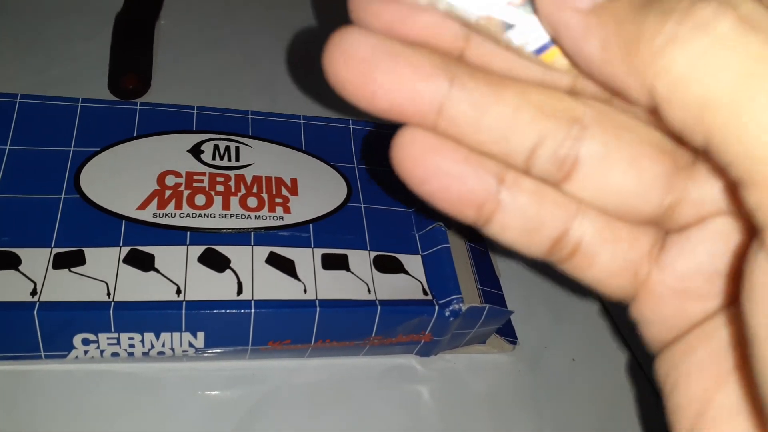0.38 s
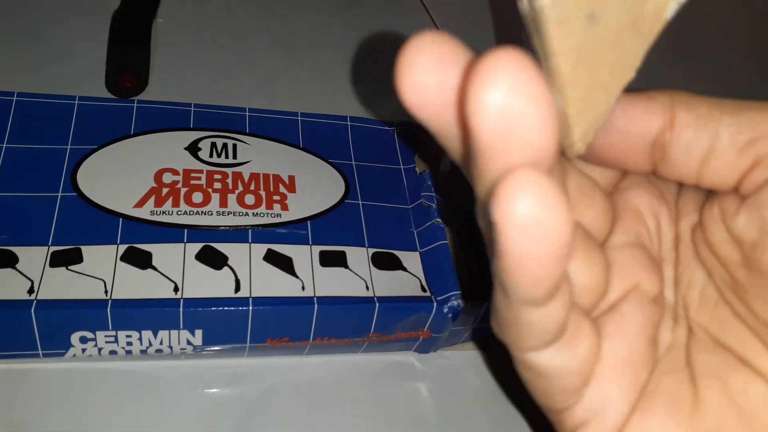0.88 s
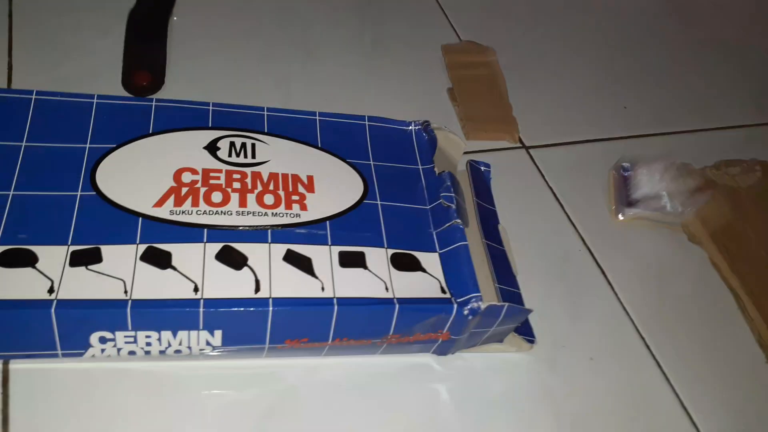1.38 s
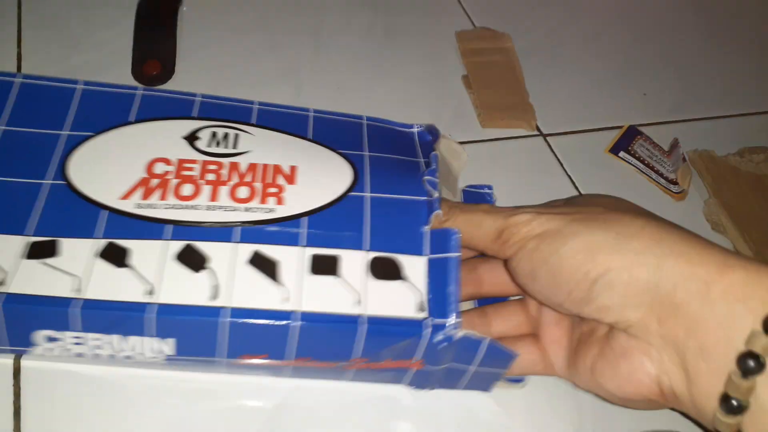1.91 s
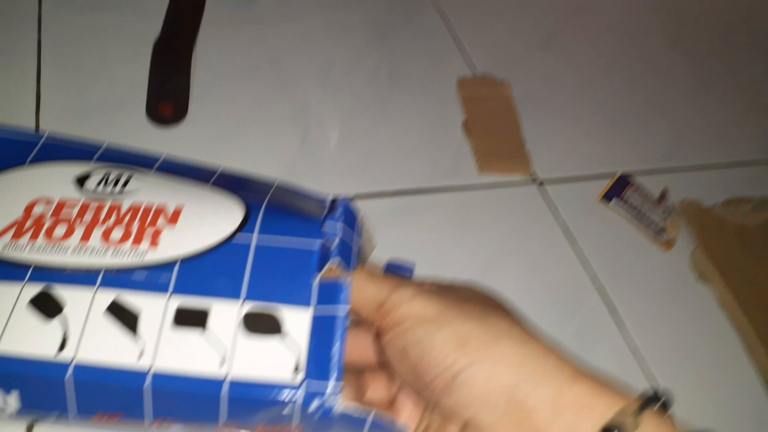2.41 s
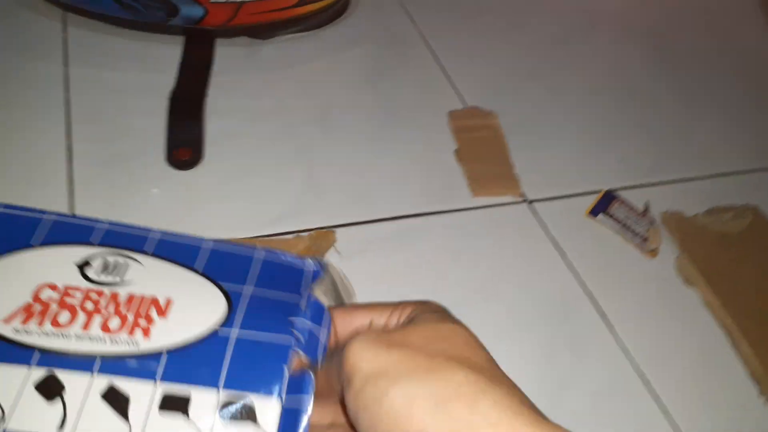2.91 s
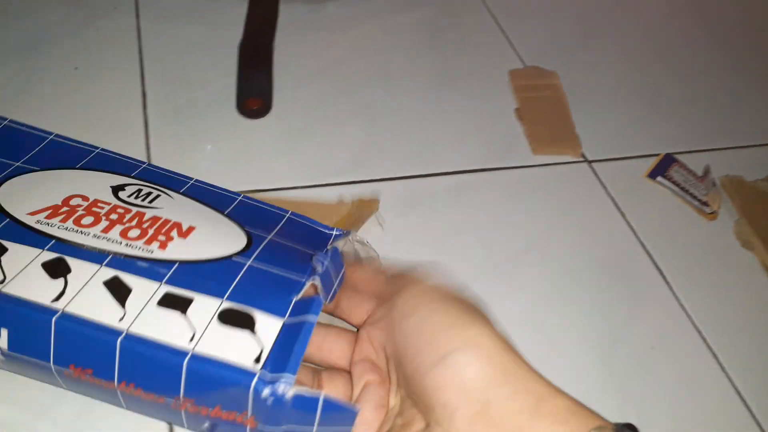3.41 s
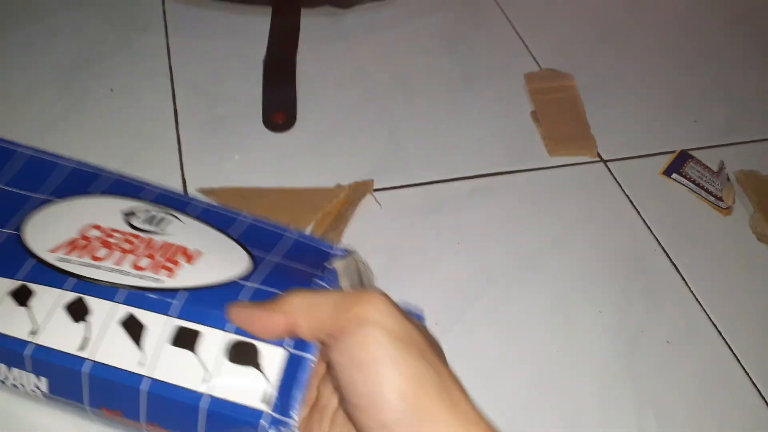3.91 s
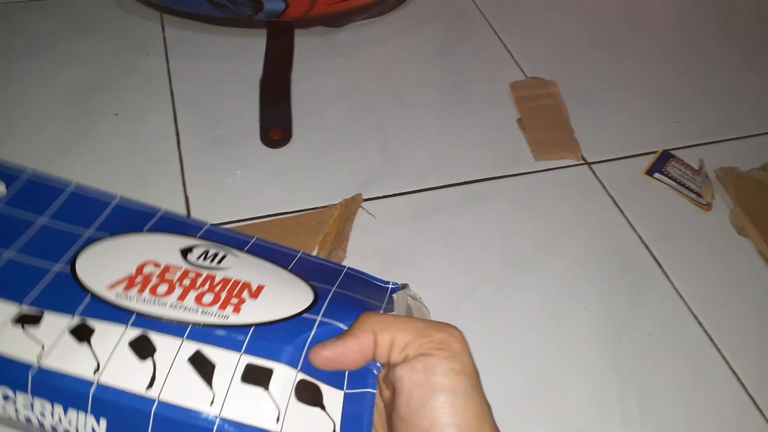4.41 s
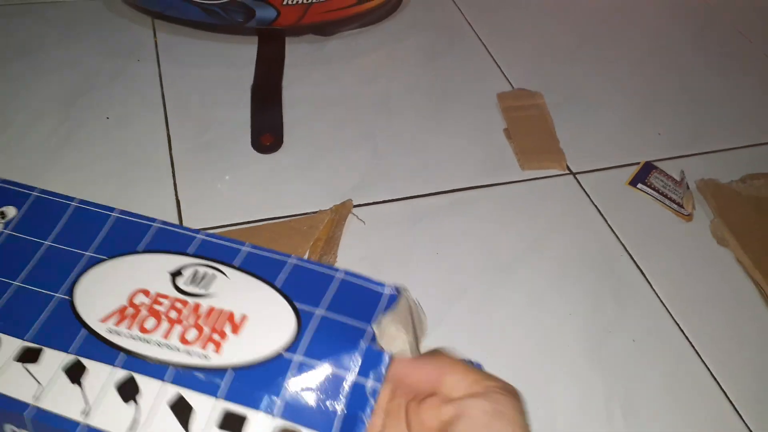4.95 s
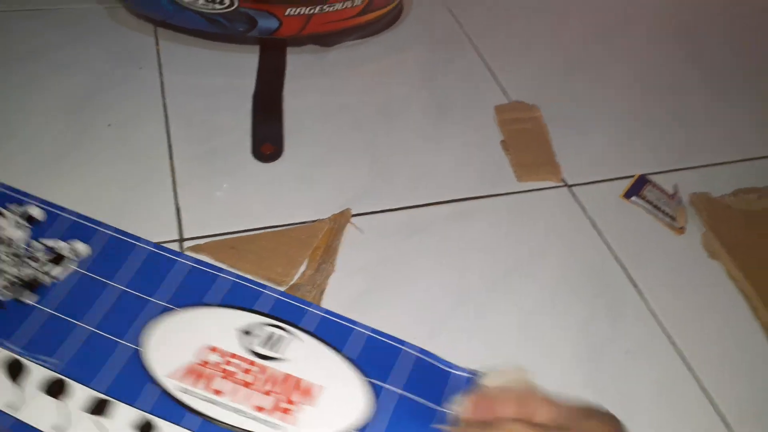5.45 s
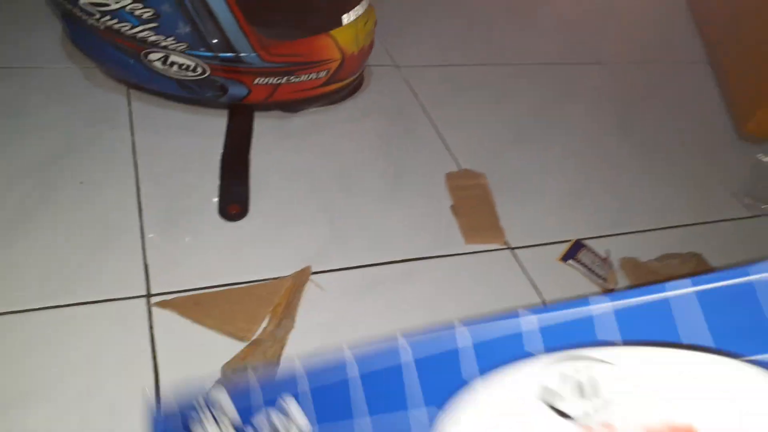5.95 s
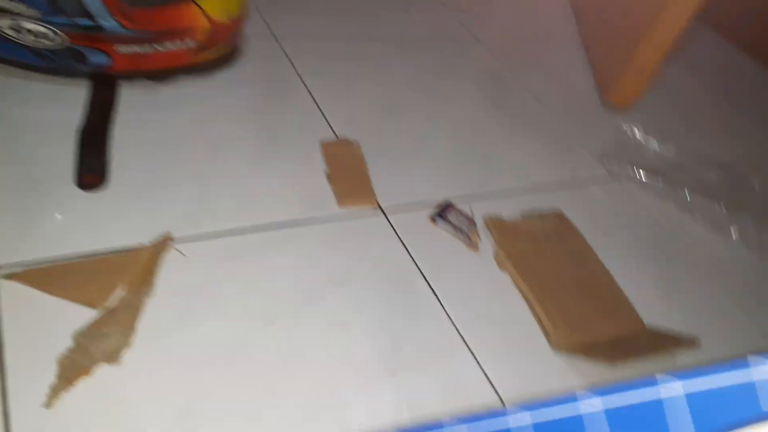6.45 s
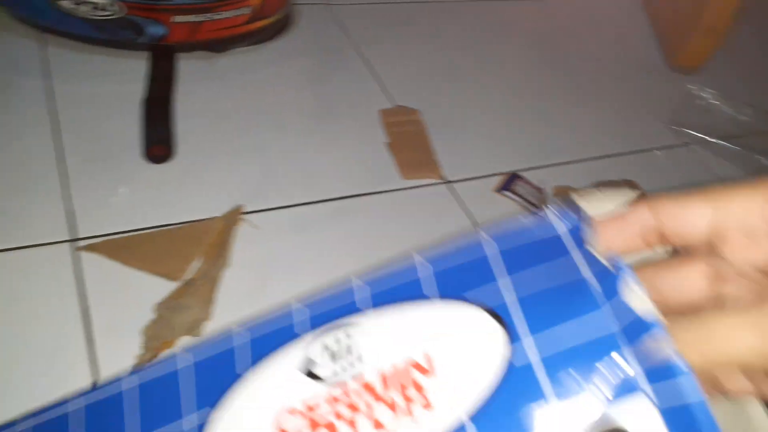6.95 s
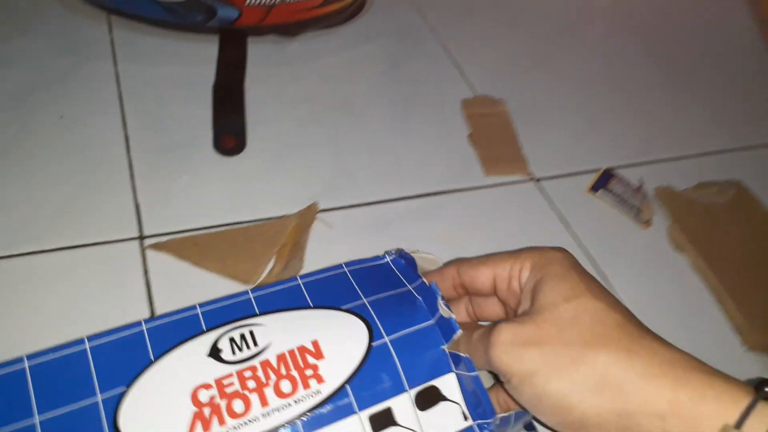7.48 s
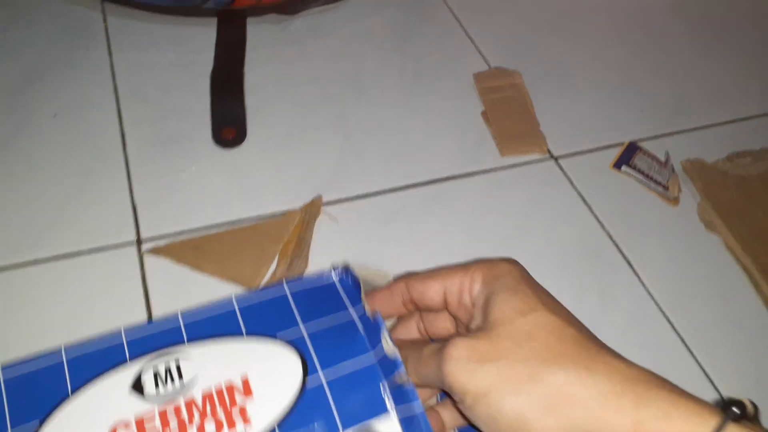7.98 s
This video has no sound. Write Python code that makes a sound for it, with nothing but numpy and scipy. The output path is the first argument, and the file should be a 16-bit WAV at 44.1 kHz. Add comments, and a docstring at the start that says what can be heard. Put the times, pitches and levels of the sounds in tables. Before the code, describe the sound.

Very soft bright flicks of card come first, almost silent between them. Rubbing and rasping of a cardboard box follows, with a hard cluster of knocks and cracks, then irregular thumps, scrapes and creases snapping, and a quick flap squeak. The handling softens but continues to the end. Close stereo pickup in a small tiled room.

```python
"""In a quiet, murmuring room fingers flick a glossy card flap, then scuff a loose scrap: shaped noise in short swells.
A hand drags and tears a cardboard box on tiles: streams of tiny slips shake its hollow, walls and fibres.
From 1.4 s the box knocks, as ringing modes that the room answers, and its card snaps, as short cracks of noise.
From 2.7 s the whole box also bumps the tiles; near 5.4 s a flap squeaks, as a fast train of slips with overtones.
Rubbing and knocks go on to the end at 8.1 s, heard by two microphones close by."""
import sys
import numpy as np
from scipy import signal
from scipy.fft import rfft, irfft, next_fast_len
from scipy.io import wavfile
from scipy.ndimage import uniform_filter1d, map_coordinates

SR = 44100
rng = np.random.default_rng(int(sys.argv[2]) if len(sys.argv) > 2 else 0)


def boost_factor(decibels):
    """Convert a level in decibels to a linear amplitude factor."""
    exponent = np.asarray(decibels, float) / 20
    return 10 ** exponent


def dump(signal):
    """Clip the signal to [-1, 1] and save it as 16-bit WAV at the path in sys.argv[1]."""
    limited = np.clip(np.atleast_2d(signal).T, -1, 1)
    pcm = np.round(limited * 32767).astype(np.int16)
    wavfile.write(sys.argv[1], SR, pcm)


N = 357147  # length in samples

# still air of the room and the microphones: (frequency [Hz], relative level [dB])
AIR_COLOUR = [(18, -81), (30, -42), (64, -5.5), (86, -8), (150, -8.5), (230, -16), (355, -27.5), (486, -34),
              (1040, -35), (3500, -47), (5200, -47), (7500, -49.5), (12000, -47.5), (16000, -47.5)]
AIR_DB = -67.5
# likeness of the two microphones: (frequency [Hz], likeness [0-1])
MIC_LIKENESS = [(60, 0.83), (150, 0.97), (300, 0.9), (700, 0.5), (1500, 0.23), (4000, 0.14), (15000, 0.1)]
# fingertips flicking the glossy flap: (time [s], level [dB])
FLICKS = [(.004, -56), (.042, -59.5), (0.06, -51), (.088, -60), (.211, -60), (0.244, -59.5), (0.272, -54.5),
          (.378, -58.5)]
# colour of the glossy flap: (frequency [Hz], relative level [dB])
FLAP_COLOUR = [(1760, -47), (3000, -23), (5370, -13.5), (6570, -7), (13300, -1.5), (16000, -27)]
FLICK_SWELL_S, FLICK_FADE_S, FLICK_TRAIL_S, FLICK_TRAIL_DB = 0.0056, 0.023, 0.18, -16
# a finger or edge dragging on one panel: (peak time [s], swell [s], fade [s], level [dB], pitch [Hz])
DRAGS = [(.15, 0.98, 0.89, -83.5, 4250), (.255, 0.062, 0.063, -57.5, 203), (1.655, 0.059, 0.048, -50, 1680),
         (1.822, .03, 0.037, -36, 1910), (6.33, 0.052, 0.077, -49, 923), (6.465, 0.033, 0.059, -47, 1080),
         (7.35, .08, 0.054, -57, 740), (7.595, 0.064, 0.056, -50, 1610)]
DRAG_Q = 4.5  # sharpness of the panel's narrow band
# weight of the hand, as the level a middling stroke reaches: (time [s], in the hollow [dB], in the walls [dB])
HAND_WEIGHT = [(0, -67, -52), (1.58, -63, -71.5), (1.66, -57.5, -62), (2.0, -50.5, -54.5),
               (2.5, -55, -62.5), (2.75, -51.5, -60.5), (2.95, -54, -54), (3.3, -52.5, -57),
               (3.56, -53, -64), (3.95, -54.5, -61), (4.5, -45, -48.5), (4.6, -54, -54.5),
               (5.1, -57, -57.5), (5.45, -50, -68.5), (5.9, -60, -55.5), (6.15, -58.5, -62),
               (6.6, -64, -62.5), (6.9, -58, -57), (7.4, -54, -60), (7.9, -54, -62), (8.1, -51, -52.5)]
# card rubbed and torn: (peak time [s], swell [s], fade [s], fibre hiss [dB], rasp [dB])
STROKES = [(0.64, 0.0036, 0.28, -69.5, -88), (0.772, 0.11, 0.046, -52.5, -71),
           (0.914, 0.1, 0.055, -68, -82), (1.289, 0.12, 0.076, -61.5, -74),
           (1.424, 0.0066, 0.4, -63.5, -73.5), (1.434, 0.0039, 0.048, -54.5, -59),
           (1.604, 0.0046, 0.24, -71, -47.5), (1.634, 0.095, 0.33, -51.5, -63),
           (1.816, 0.053, 0.17, -47, -41.5), (2.021, 0.1, 0.25, -49.5, -55.5),
           (2.225, 0.17, 0.12, -47, -46), (2.403, 0.28, 0.14, -49.5, -45), (2.534, 0.031, 0.15, -44.5, -42),
           (2.659, 0.042, 0.089, -46, -40), (2.707, 0.017, 0.083, -39, -24),
           (2.737, 0.029, 0.038, -38, -33.5), (2.791, 0.0049, 0.087, -43, -39.5),
           (2.898, 0.082, 0.18, -57.5, -59), (2.972, 0.01, 0.1, -53.5, -48),
           (3.065, 0.099, 0.073, -49, -50), (3.183, 0.14, 0.54, -54.5, -50), (3.429, 0.11, 0.16, -51, -52),
           (3.579, 0.0063, 0.099, -50.5, -36), (3.705, 0.1, 0.094, -51.5, -50.5),
           (3.832, 0.016, 0.15, -44.5, -43.5), (3.913, 0.037, 0.11, -43.5, -42.5),
           (4.043, 0.28, 0.077, -42.5, -36), (4.15, 0.0102, 0.11, -64.5, -60),
           (4.211, 0.0072, 0.15, -60.5, -55), (4.325, 0.0091, 0.16, -60.5, -63),
           (4.544, 0.0067, 0.75, -55, -48), (4.664, 0.077, 0.083, -44.5, -40),
           (4.712, 0.0081, 0.032, -50, -37.5), (4.784, 0.04, 0.085, -51, -44.5),
           (4.856, 0.0073, 0.074, -51.5, -37), (5.076, 0.0033, 0.033, -54, -23.5),
           (5.112, 0.13, 0.13, -47, -35), (5.3, 0.11, 0.14, -45.5, -47), (5.457, 0.059, 0.16, -44, -41.5),
           (5.553, 0.052, 0.44, -50.5, -48), (5.986, 0.064, 0.086, -57.5, -49),
           (6.126, 0.0043, 0.035, -67.5, -43.5), (6.155, 0.054, 0.1, -49, -41),
           (6.225, 0.042, 0.11, -51, -53.5), (6.343, 0.15, 0.049, -57, -46.5),
           (6.453, 0.079, 0.22, -57.5, -49), (6.635, 0.11, 0.29, -52.5, -50),
           (6.805, 0.01, 0.19, -46.5, -41.5), (7.02, 0.13, 0.092, -57, -53.5),
           (7.275, 0.59, 0.18, -58.5, -56), (7.387, 0.02, 0.071, -48.5, -43.5),
           (7.485, 0.047, 0.14, -50, -45), (7.627, 0.076, 0.42, -60, -56), (7.85, 0.0076, 0.98, -73, -68.5),
           (7.98, 0.06, 0.58, -62, -52), (8.09, 0.045, 0.1, -64, -65)]
MIDDLING_RASP_DB = -55
HOLLOW_FOLLOWS, WALLS_FOLLOW = 1, 0.87  # dB gained for each dB of rasp
# colours of the rubbing layers, from low to high: (frequency [Hz], relative level [dB])
RUMBLE_COLOUR = [(18, -70.5), (30, -47.5), (56, -10.5), (75, -6.5), (243, -6.5), (299, -3), (400, -11),
                 (520, -38), (880, -120)]
RASP_COLOUR = [(590, -26), (1000, -15), (1410, -14.5), (2020, -21), (3800, -33), (4940, -31), (8360, -120)]
FIBRE_COLOUR = [(900, -30), (1880, -4.5), (3200, -4), (7080, -9), (8790, -5), (10500, -7), (11800, -6.5),
                (15100, -9.5), (16000, -20)]
# a loose scrap of card scuffed between the fingers: (peak time [s], swell [s], fade [s], level [dB])
SCUFFS = [(.706, .008, 0.13, -66), (.762, 0.021, 0.04, -48.5)]
# colour of the loose scrap: (frequency [Hz], relative level [dB])
SCRAP_COLOUR = [(900, -30), (1500, -4), (2400, 0), (3300, -4), (4300, -25)]
# modes (natural tones) of the box walls and hollow: (frequency [Hz], level [dB], time to fall 60 dB [s])
BOX_MODES = [(72, 5.5, 0.16), (105, 7.5, 0.094), (157.9, 5, 0.12), (197, -0.5, 0.071), (303.4, 6, 0.061),
             (444.4, 2, 0.031), (532, 3, 0.03), (676, 6, 0.049), (746.2, 6.5, 0.038), (828, 2, 0.045),
             (978, -11, 0.076), (1208, 9.5, 0.029), (1626, 2.5, 0.04), (2092, 3.5, 0.033),
             (2456, -4.5, 0.057)]
# knocks on the box: (time [s], strength [dB], favoured pitch [Hz], thud strength [dB], edge strength [dB])
KNOCKS = [(1.421, -39.5, 345, -26, -24), (1.611, -33, 428, -37, -26), (1.621, -37.5, 756, -16, -24),
          (1.633, -34, 840, -14, -13), (1.797, -24, 440, -21, -20), (1.825, -25, 438, -12, -16),
          (1.869, -36.5, 720, -7.5, -15), (1.936, -32.5, 430, -13, -22), (1.959, -30.5, 430, -14, -10),
          (2.343, -37.5, 715, -36, 3), (2.394, -40, 655, -13, -20), (2.523, -30.5, 690, -19, 1),
          (2.665, -23, 520, -20, -2.5), (2.694, -5.5, 440, -15.5, -20), (2.7055, -6.5, 770, -42, -9),
          (2.736, -14.5, 740, -14.5, 3), (2.77, -24, 770, -19, -23), (2.794, -25.5, 440, -18.5, -7.5),
          (3.051, -37, 706, -20, -2.5), (3.577, -10, 670, -25, -14.5), (3.631, -16.5, 700, -24.5, -11.5),
          (3.66, -29, 680, -18, -21), (3.684, -33, 725, -11, -21), (3.793, -31, 530, -14, -7.5),
          (3.82, -34, 626, -7, -8), (3.833, -16.5, 603, -15, -12.5), (3.983, -28.5, 640, -25, 0),
          (4.086, -24.5, 876, -18.5, -9), (4.21, -22.5, 520, -21.5, -16), (4.321, -46, 647, -8, 11),
          (4.543, -20.5, 403, -16.5, -17), (4.712, -21.5, 785, -29, -9), (4.747, -29.5, 660, -24.5, -30),
          (4.793, -27.5, 594, -23, -25), (4.858, -27, 775, -7, -26), (4.886, -14.5, 580, -24, -18.5),
          (4.98, -26, 530, -26, -10), (5.033, -31, 676, -18, -6), (5.063, -34, 626, -20, -21),
          (5.0761, -24, 955, -26, -4), (5.087, -11, 1040, -29, -24), (5.0965, -14.5, 660, -26, -18),
          (5.108, -10.5, 670, -29, -17), (5.131, -7.5, 672, -24, -12), (5.147, -27, 700, -9, -27),
          (5.171, -24, 704, -18, -6), (5.23, -21, 700, -47.5, -9.5), (5.296, -27.5, 630, -13, -10),
          (5.307, -29, 630, -16.5, -5), (5.407, -29, 704, -29, -13), (5.4722, -17, 660, -50, -8.5),
          (5.547, -27.5, 720, -20.5, -21), (5.564, -31.5, 670, -15, 5), (5.987, -41, 780, -4.5, -3),
          (6.126, -34.5, 950, -14, 3.5), (6.149, -35.5, 350, -2, 0), (6.619, -30, 440, -17.5, -6.5),
          (6.804, -17, 402, -18.5, -13), (6.814, -25.5, 590, -18, -5), (6.865, -15, 382, -25.5, -20.5),
          (7.019, -42.5, 920, -24, 5.5), (7.283, -44, 636, -8, 5), (7.378, -41, 850, -32, -18),
          (7.391, -22.5, 332, -15.5, -34), (7.394, -27.5, 680, -33, -23), (7.475, -25, 524, -30, -24),
          (7.532, -29.5, 526, -22, -12), (7.672, -37.5, 640, -14, -30), (7.9754, -17, 447, -18.5, -13.5),
          (7.983, -26, 730, -30, -20)]
THUD_HZ = 256  # pitch favoured by the thud under a knock
# the whole box bumping the tiles: (time [s], strength [dB], favoured pitch [Hz])
BUMPS = [(2.667, -35.5, 128), (2.795, -44.5, 153), (3.822, -36, 158), (4.717, -41.5, 153),
         (4.793, -46, 160), (5.073, -38, 161), (5.988, -46, 110), (6.152, -37.5, 73), (6.475, -47, 312),
         (6.618, -39.5, 80.5), (6.803, -36, 106), (6.863, -36, 94), (7.637, -54, 305)]
# how fast the room's answer dies: (frequency [Hz], time to fall 60 dB [s])
ROOM_DECAY = [(150, 0.12), (1000, 0.15), (4000, 0.24), (14000, 0.077)]
# fibres and creases snapping: (time [s], strength [dB], colour peak [Hz])
SNAPS = [(1.4378, -60, 2030), (1.657, -39, 2800), (1.826, -32.5, 2110), (1.845, -38.5, 3900),
         (2.5174, -37.5, 2410), (2.663, -23.5, 6800), (2.6952, -19, 2040), (2.7366, -23.5, 2090),
         (2.794, -25, 3600), (2.797, -30, 4200), (2.8737, -39, 2010), (3.5832, -24, 2320),
         (3.7083, -41, 4310), (3.794, -37, 3450), (3.8205, -35, 2580), (4.1513, -48.5, 2330),
         (4.2095, -38, 2420), (4.68, -37, 2500), (4.713, -27.5, 3020), (4.787, -30.5, 3160),
         (4.863, -30.5, 3030), (4.981, -42, 2220), (5.0761, -25, 4160), (5.088, -32, 4480),
         (5.111, -32, 2100), (5.136, -29, 3860), (5.186, -38, 1710), (5.5507, -27.5, 9000),
         (5.5642, -30, 2070), (6.125, -30, 2030), (6.214, -42, 5600), (6.227, -41, 5800),
         (6.262, -40, 4300), (6.8042, -35, 2240), (7.283, -40.5, 2350), (7.3843, -32.5, 3030),
         (7.977, -38, 2670)]
SNAP_Q, SNAP_PEAK = 3.5, 3  # sharpness of a snap's colour, and gain of the ring added to the plain crack
# a flap slipping on card: (time [s], slips per second [Hz], level [dB], slope of the overtones [dB per octave])
SQUEAK = [(5.421, 610, -44, -23), (5.427, 575, -24, -13), (5.44, 508, -28.5, -9), (5.455, 476, -33, -5.5),
          (5.467, 462, -34, -6)]
# the squeaking flap's own ring: (frequency [Hz], width [Hz], boost [dB])
SQUEAK_RINGS = [(950, 200, 6), (2500, 900, 6), (4800, 2400, 5)]
# where the hand works: (time [s], left louder by [dB], left sooner by [ms])
PLACE = [(0, -1.2, -0.22), (1.4, 0, -0.21), (1.7, 2.8, 0.15), (3.7, 4, .155), (4.7, 3.2, .155),
         (5.4, 4.2, 0.13), (6.1, .3, -0.25), (6.8, 2.4, -0.15), (7.2, .5, 0.25), (8.1, .8, 0.1)]
# the camera body tilts the colour: (frequency [Hz], gained left and lost right [dB])
BODY_TILT = [(150, -1.3), (900, .3), (2500, -1.83), (5000, -2.2), (9000, -0.52), (14000, .8)]


def along(points, hz):
    """Reads a table of (Hz, value) points on a logarithmic frequency axis."""
    f, v = np.transpose(points)
    return np.interp(np.log(hz + 1), np.log(f + 1), v)


def colour_of(points):
    """Turns a table of (Hz, dB) into a function giving the gain at each frequency."""
    return lambda hz: boost_factor(along(points, hz))


def unit(x):
    """Scales a signal to an rms (average strength) of 1."""
    return x / np.sqrt(np.mean(x ** 2) + 1e-20)


def filtered(x, response):
    """Multiplies the spectrum of x by a response that may be complex."""
    m = next_fast_len(N + 8192)
    return irfft(rfft(x, m) * response(np.fft.rfftfreq(m, 1 / SR)), m)[..., :N]


def wobble(rate):
    """Draws a smooth random curve through `rate` random points a second."""
    points = rng.standard_normal(int(N * rate / SR) + 4)
    return map_coordinates(points, [np.arange(N) * rate / SR])


def curves(rows):
    """Gives one value per sample for each column after the time."""
    s, *columns = np.transpose(rows)
    return [np.interp(np.arange(N) / SR, s, c) for c in columns]


def swells(rows, rest_db=-90):
    """Sums the power of (peak s, swell s, fade s, dB) strokes over a resting level, as dB per sample."""
    t = np.arange(0, N / SR, .002)
    s, swell, fade, db = (c[:, None] for c in np.transpose(rows))
    shape_db = 20 * np.where(t < s, (t - s) / swell, (s - t) / fade)  # swell and fade each span 20 dB
    power = (boost_factor(db + shape_db) ** 2).sum(0) + boost_factor(rest_db) ** 2
    return np.interp(np.arange(N) / SR, t, 10 * np.log10(1e-20 + power))


def spread(pair, colour, patchy_db=0, size=256):
    """Gives two noise streams random loud and soft patches, the microphones' likeness, a colour and rms 1."""
    z = signal.stft(pair, nperseg=size)[2]  # a larger size makes patches longer and narrower in pitch
    patches = uniform_filter1d(rng.standard_normal(z.shape[1:]), size=5, axis=0)
    patches = unit(uniform_filter1d(patches, size=14, axis=1))
    pair = signal.istft(z * boost_factor(patchy_db * patches), nperseg=size)[1][:, :N]

    def mid_side(hz):
        angle = np.arccos(np.clip(along(MIC_LIKENESS, hz), 0, 1)) / 2
        return colour(hz) * [np.cos(angle), np.sin(angle)]

    mid, side = filtered(pair, mid_side)
    return unit(np.array([mid + side, mid - side]))


def grit(rate, spread_db, share):
    """Makes two unrelated streams of small slips of uneven size, `rate` a second, over fine noise."""
    happens = rng.random((2, N)) < rate / SR
    size = boost_factor(spread_db * rng.standard_normal((2, N)))
    slips = happens * rng.choice([-1, 1], (2, N)) * size
    return np.sqrt(share) * unit(slips) + np.sqrt(1 - share) * rng.standard_normal((2, N))


def air():
    """The low murmur of the house and microphone hiss: coloured noise whose level gently wanders."""
    murmur = spread(rng.standard_normal((2, N)), colour_of(AIR_COLOUR))
    return boost_factor(AIR_DB + 0.48 * wobble(7)) * murmur


def flicks():
    """Fingers brush a loose glossy flap: each flick is a quick swell of bright grit with a softer trail."""
    rows = [(s, FLICK_SWELL_S, FLICK_FADE_S, db) for s, db in FLICKS]
    rows += [(s, FLICK_SWELL_S, FLICK_TRAIL_S, db + FLICK_TRAIL_DB) for s, db in FLICKS]
    flap = spread(grit(2500, 5, 0.3), colour_of(FLAP_COLOUR), patchy_db=2.0)
    return boost_factor(swells(rows)) * flap


def drags():
    """A finger or edge makes one panel hiss or sing: noise passed through a single resonance."""
    noise = rng.standard_normal(N)
    out = np.zeros(N)
    for *stroke, pitch in DRAGS:
        band = lambda hz: 1 / (1 + (DRAG_Q * (hz / pitch - pitch / (hz + 1))) ** 2)
        out += boost_factor(swells([stroke], -np.inf)) * unit(filtered(noise, band))
    return out


def hollow(hz, low_hz, high_hz, widen):
    """Adds up the box modes between two frequencies as resonances, each `widen` times its natural width."""
    modes = [(c, db, widen * np.log(1000) / (np.pi * t60)) for c, db, t60 in BOX_MODES if low_hz < c < high_hz]
    return sum((-1) ** k * boost_factor(db) * 1j * hz * width / (c * c - hz * hz + 1j * hz * width)
               for k, (c, db, width) in enumerate(modes))


def rubbing():
    """Card drags on card and tile in jerks: each stroke excites walls, hollow and fibres together."""
    fibre_db = swells([(s, swell, fade, db) for s, swell, fade, db, _ in STROKES])
    rasp_db = swells([(s, swell, fade, db) for s, swell, fade, _, db in STROKES])
    hollow_db, walls_db = curves(HAND_WEIGHT)
    # each stroke also shakes hollow and walls
    scrape_db = hollow_db + HOLLOW_FOLLOWS * (rasp_db - MIDDLING_RASP_DB)
    rumble_db = walls_db + WALLS_FOLLOW * (rasp_db - MIDDLING_RASP_DB)
    jerk = wobble(45) + .8 * wobble(110)
    rumble = spread(grit(120, 4, .4), colour_of(RUMBLE_COLOUR))
    box_tone = lambda hz: hollow(hz, 350, 1100, widen=2.44)
    scrape = spread(grit(300, 5, .45), box_tone, patchy_db=2.5, size=1024)
    # bending card shifts its resonances, so the rasp is patchy
    rasp = spread(grit(900, 5, 0.5), colour_of(RASP_COLOUR), patchy_db=2.6, size=512)
    fibre = spread(grit(2800, 3.8, 0.48), colour_of(FIBRE_COLOUR), patchy_db=1.3)
    low = boost_factor(rumble_db + 1.8 * jerk) * rumble + boost_factor(scrape_db + 1.8 * jerk) * scrape
    return low + boost_factor(rasp_db + 1.0 * jerk) * rasp + boost_factor(fibre_db + 1.92 * jerk) * fibre


def scuff():
    """The loose scrap rasps higher than the box: coloured noise in short swells."""
    return boost_factor(swells(SCUFFS)) * unit(filtered(rng.standard_normal(N), colour_of(SCRAP_COLOUR)))


def knocks():
    """Each soft blow rings the modes near its favoured pitches; bending card detunes them from blow to blow."""
    out, t = np.zeros((2, N + SR)), np.arange(SR // 10) / SR
    hz, mode_db, t60 = (c[:, None] for c in np.transpose(BOX_MODES))
    side = np.array([1, -1])[:, None, None]
    # modes far from the favoured pitch ring less: dB lost per octave
    deep_db = lambda thud_hz: -12 * np.abs(np.log2(hz / thud_hz)) + 7.1
    near_db = lambda best_hz: -29 * np.abs(np.log2(hz / best_hz)) - 1.5
    blows = []
    for s, db, best_hz, thud_db, edge_db in KNOCKS:
        upper_db = np.where(hz > 1100, edge_db - 10.0, near_db(best_hz))
        blows.append((s, db + np.where(hz < 350, deep_db(THUD_HZ) + thud_db, upper_db)))
    blows += [(s, db + deep_db(bump_hz)) for s, db, bump_hz in BUMPS]
    soft = 1 - np.exp(-(t * hz / 1.3) ** 2)  # the card gives way for a cycle or two before it rings
    for s, gain_db in blows:
        luck = rng.standard_normal((3, len(BOX_MODES), 1))  # for level, tuning and phase
        bent_hz = hz * (1 + np.where(hz > 1100, .09, .025) * luck[1])
        swing = np.sin(2 * np.pi * bent_hz * t + 0.23 * side * luck[2])  # each wall radiates from its own spot
        ring = boost_factor(gain_db + mode_db + 1.5 * luck[0] - 60 * t / t60) * swing
        start = round((s - .001) * SR)  # the soft onset begins 1 ms before the listed time
        out[:, start:start + len(t)] += (soft * ring).sum(1)
    return out[:, :N]


def room(x):
    """Tiles and walls answer after 160 samples with fading noise; each frequency dies at its own speed."""
    hz, t, z = signal.stft(rng.standard_normal((2, SR // 2)), SR, nperseg=256)
    fade = boost_factor(-60 * t / along(ROOM_DECAY, hz)[:, None])
    tail = signal.istft(z * fade, SR, nperseg=256)[1]
    delayed = np.pad(x.mean(0), (160, 0))[None]
    return signal.fftconvolve(delayed, tail / np.linalg.norm(tail[0]), axes=1)[:, :N]


def snaps():
    """A crack of noise, then a short fray of fibres, partly shared by the microphones, in each crease's colour."""
    out, t = np.zeros((2, N + SR)), np.arange(SR // 16) / SR
    hz = np.fft.rfftfreq(len(t), 1 / SR)
    crack_and_fray = 1.5 * boost_factor(-60 * t / .011) + .1 * boost_factor(-60 * t / .06)
    fade = (1 - np.exp(-t / .0002)) * crack_and_fray
    for s, db, peak_hz in SNAPS:
        hiss = rng.standard_normal((3, len(t)))  # left, right and shared
        ring = 1j * hz * peak_hz / SNAP_Q
        colour = 1 + SNAP_PEAK * ring / (peak_hz ** 2 - hz ** 2 + ring)
        colour = colour * 1j * hz / (2600 + 1j * hz) / (1 + 1j * hz / 9000)  # less bass, softer top
        crack = irfft(rfft((0.36 * hiss[2] + hiss[:2]) * fade) * colour, len(t))
        start = round(s * SR)
        out[:, start:start + len(t)] += boost_factor(db - 5.5) * crack
    return out[:, :N]


def squeak():
    """Stick and slip: a slightly unsteady train of slips, round at first, then sharper, through the flap's ring."""
    s, hz, db, slope_db = np.transpose(SQUEAK)
    t = np.arange(s[0] - .004, s[-1] + 0.0067, 1 / SR)
    pitch = np.interp(t, s, hz)
    phase = 2 * np.pi * np.cumsum(pitch * (1 + .018 * wobble(500)[:len(t)])) / SR
    k = np.arange(1, 14)[:, None]  # number of each harmonic
    flutter = unit(uniform_filter1d(rng.standard_normal((13, len(t))), size=300, axis=1))
    ring_db = sum(top_db / (1 + (2 * (k * pitch - c) / width) ** 2) for c, width, top_db in SQUEAK_RINGS)
    # the table's slope holds up to the sixth harmonic, then 9 dB lost per factor of e^(ln 2), an octave
    fall_db = np.interp(t, s, slope_db) * np.log2(np.minimum(k, 6)) - 9 * np.log2(np.maximum(k, 6) / 6)
    tone = (boost_factor(fall_db + ring_db + np.minimum(k, 4) * flutter) * np.sin(k * phase)).sum(0)
    hiss = np.diff(rng.standard_normal(len(t) + 1))
    tone += boost_factor(-23) * hiss * (1 + np.cos(phase)) / 2  # each slip also hisses
    gate = np.interp(t, [t[0], s[0], s[-1], t[-1]], [0, 1, 1, 0])
    out = np.zeros(N)
    out[round(t[0] * SR):][:len(t)] = boost_factor(np.interp(t, s, db)) * gate * tone
    return out


def place(pair):
    """The box moves before the microphones: one hears it louder and sooner."""
    pan_db, lead_ms = curves(PLACE)
    out = []
    for side, x in zip([1, -1], pair):
        moment = np.arange(N) + side * lead_ms / 2000 * SR  # half the lead goes to each side
        out.append(boost_factor(side * pan_db / 2) * map_coordinates(x, [moment]))
    return np.array(out)


def scene():
    """Box, flap, loose scrap, room and air together."""
    hits = knocks() + snaps() + squeak()
    handling = flicks() + drags() + rubbing() + scuff()
    answer = filtered(room(hits), lambda hz: hz / (hz + 250))  # less bass
    return air() + place(handling + hits) + boost_factor(-9.0) * answer


def top_cut(x):
    """Nothing passes above the cut-off."""
    return signal.sosfilt(signal.butter(12, 15920, fs=SR, output="sos"), x)


def record(dry):
    """The microphones drop the deepest bass, tilt the colour left to right and round off the highest peaks."""
    tilt = lambda hz: boost_factor([[1], [-1]] * along(BODY_TILT, hz))
    heard = filtered(dry, lambda hz: (1j * hz / (45 + 1j * hz)) ** 2 * tilt(hz))
    heard = heard / (1 + np.abs(heard / .95) ** 6) ** (1 / 6)
    return top_cut(heard)


dry = scene()
out = record(dry)
dump(out)
```